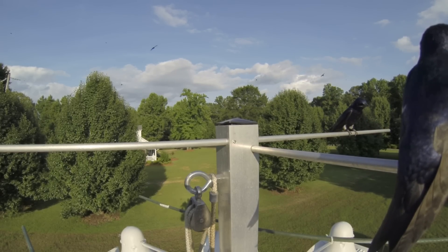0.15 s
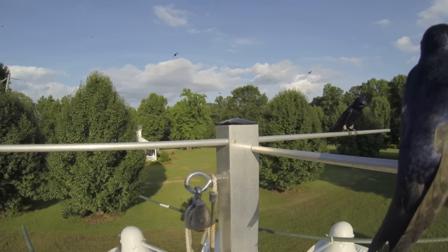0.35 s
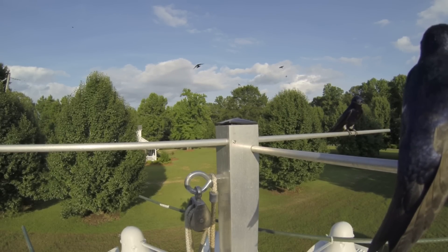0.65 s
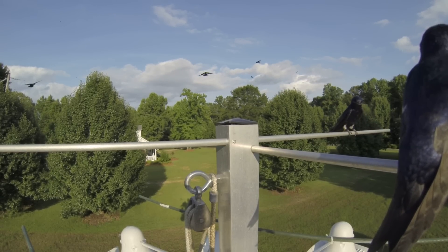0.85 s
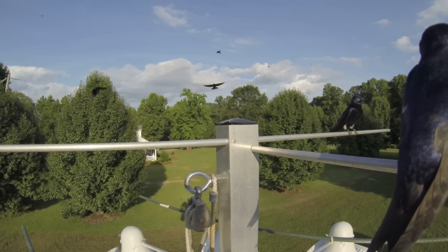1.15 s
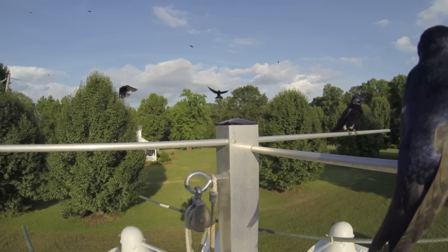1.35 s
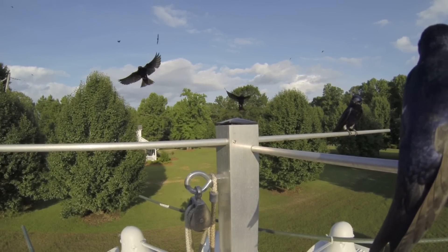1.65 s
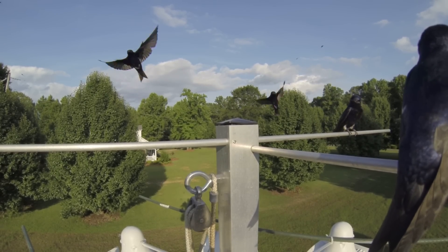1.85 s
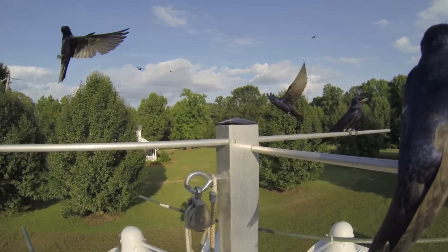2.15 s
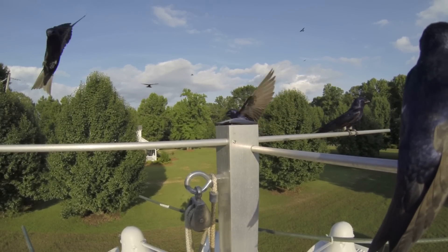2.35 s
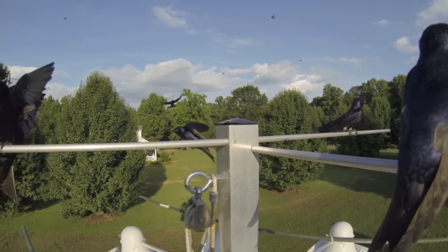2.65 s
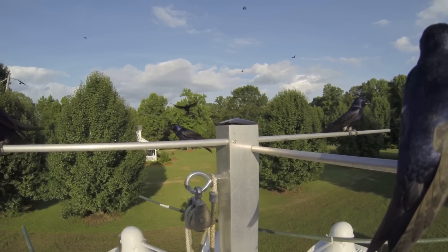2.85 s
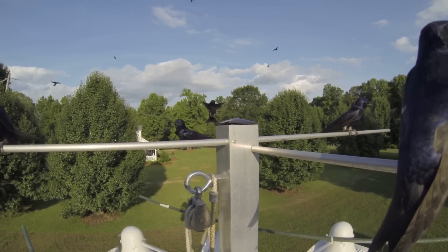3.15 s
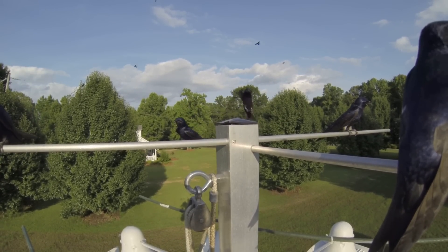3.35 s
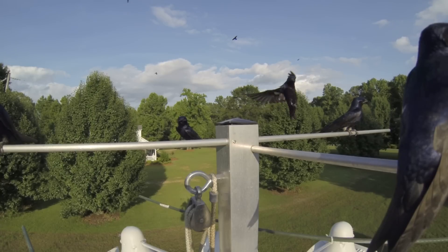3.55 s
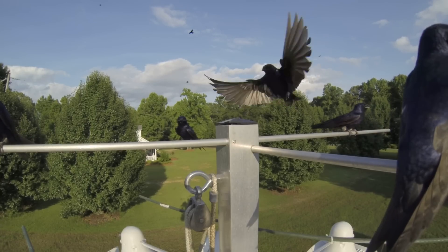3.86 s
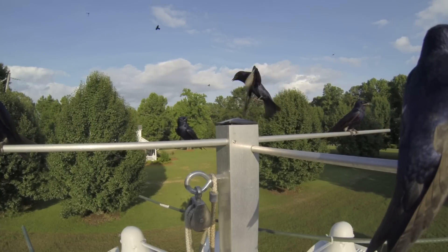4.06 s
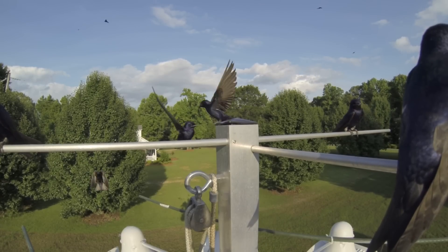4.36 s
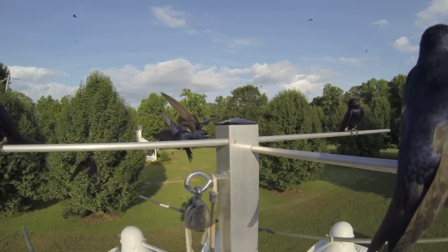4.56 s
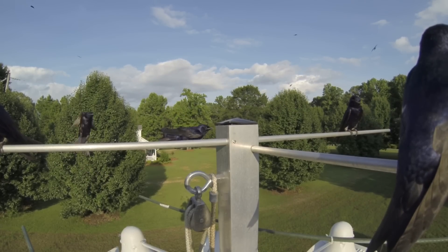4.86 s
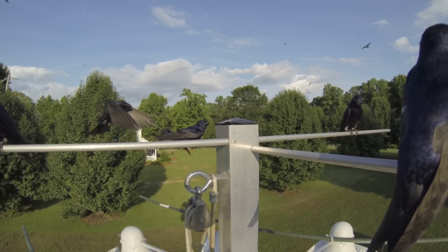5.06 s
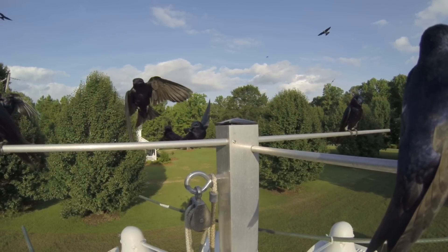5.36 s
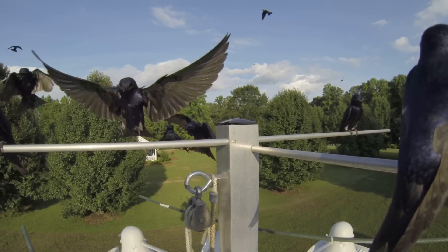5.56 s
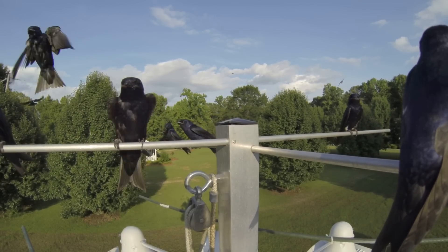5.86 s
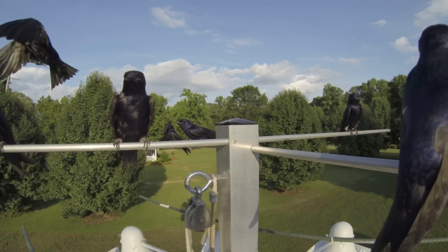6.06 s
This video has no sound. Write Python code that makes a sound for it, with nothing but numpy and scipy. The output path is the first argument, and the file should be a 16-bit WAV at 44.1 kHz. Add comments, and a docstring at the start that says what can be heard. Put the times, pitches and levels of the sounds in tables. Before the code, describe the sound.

Outdoor martin colony heard from a microphone mounted among the perches. It begins nearly quiet, with soft rumble, hiss and thin electronic whine and one faint falling buzz. Quick downward chirps then arrive in clusters, mixed with lower throaty notes and noisy rasps. One strong, rapid trill sounds near the middle; afterwards the lively chatter keeps going. Close surfaces blur each call and distant trees return a faint answer.

```python
"""Purple martins chatter on their bird house on an open lawn, round the microphone of a camera mounted on it.
Throughout: a low outdoor rumble, steady hiss and the thin electrical whine of the camera.
A faint trilled buzz opens at half a second; from about 1.1 s steep falling whistles come thick, among
short lower notes, noisy rasps and, near 3.1 s, the loudest buzz, with its own faint echo from the trees.
The house throws each call back at once, and trees some 26 m off answer 0.15 s later, until the end."""
import sys
import numpy as np
from scipy import signal
from scipy.fft import rfft, irfft, next_fast_len
from scipy.io import wavfile

SR = 44100
rng = np.random.default_rng(int(sys.argv[2]) if len(sys.argv) > 2 else 0)


def to_wav(sig):
    """Store sig (one row per channel, or 1-D mono) as 16-bit WAV at the path in sys.argv[1].

    Samples outside -1..1 are clipped; the rate is SR.
    """
    pcm = np.clip(np.atleast_2d(sig), -1, 1) * 32767
    pcm = np.round(pcm).astype(np.int16)
    wavfile.write(sys.argv[1], SR, pcm.T)  # frames by channels


N = 273420  # samples, 6.2 s
EDGE_HZ = 15300  # upper band limit


def amp(db):
    """Decibels to gain."""
    return 10 ** (np.asarray(db) / 20)


def evened(x):
    """Scales to an rms of 1."""
    return x / np.sqrt(np.mean(x ** 2) + 1e-20)


def read(points, hz):
    """A spectrum joined by straight lines on a log-frequency axis."""
    f, value = np.transpose(points)
    return np.interp(np.log(hz + 1), np.log(f + 1), value)


def add(mix, s, sound):
    """Mixes a sound in at s seconds."""
    part = mix[max(round(s * SR), 0):][:len(sound)]
    part += sound[:len(part)]


def coloured(count, gain):
    """Noise of rms 1 whose spectrum follows gain(Hz)."""
    size = next_fast_len(count + 2048)
    spectrum = rfft(rng.standard_normal(size))
    noise = irfft(spectrum * gain(np.fft.rfftfreq(size, 1 / SR)), size)
    return evened(noise[:count])


def below(f, hz):
    """Gain of a gentle low-pass, halved at hz."""
    return 1 / (1 + (f / hz) ** 4)


def wander(count, hz):
    """Slow chance of rms 1, up to about hz."""
    return coloured(count, lambda f: below(f, hz))


def fade(t, edge, release=None):
    """Soft start, edge seconds long, and a soft stop of the same length unless release is given."""
    ramp = np.minimum(t / edge, (t[-1] - t) / (release or edge))
    return np.sin(np.pi / 2 * np.clip(ramp, 0, 1)) ** 2


# Steady electrical tones of the camera: (frequency [Hz], level [dB])
WHINE_TONES = [(646.0, -62), (1174, -60), (1292, -58.5), (1351, -53), (1938, -58)]


def whine(waver=0.07):
    """Faint electrical tones at the microphone, wavering slightly together."""
    t = np.arange(N) / SR
    tones = sum(amp(db) * np.sin(2 * np.pi * (hz * t + rng.random())) for hz, db in WHINE_TONES)
    return np.sqrt(2) * tones * (1 + waver * wander(N, 3.3))


# Spectral shape of the outdoor air: (frequency [Hz], relative level per Hz [dB])
AIR_SPECTRUM = [(25, -1.5), (60, -1.5), (140, -2.5), (300, -12), (800, -15), (1600, -19.5), (3100, -21.5),
                (4600, -33.5), (5300, -34.5), (7500, -48), (9200, -28.5), (10000, -43.5), (11200, -39),
                (12200, -60.5)]


def air(rumble_db=-42.5, hiss_db=-47, split_hz=220, swell_db=1):
    """Steady outdoor hiss over a rumble that swells with the breeze."""
    def rumble_colour(f):
        return amp(read(AIR_SPECTRUM, f)) * below(f, split_hz)

    def hiss_colour(f):
        return amp(read(AIR_SPECTRUM, f)) * np.sqrt(1 - below(f, split_hz) ** 2)

    rumble = coloured(N, rumble_colour) * amp(rumble_db + swell_db * wander(N, 1.6))
    return rumble + amp(hiss_db) * coloured(N, hiss_colour)


def scatter(x, delay, t60, top_hz):
    """A diffuse echo, dying by 60 dB in t60 seconds, that has lost its treble above top_hz."""
    t = np.arange(SR) / SR
    decay = (t > delay) * amp(-60 * np.maximum(t - delay, 0) / t60)
    tail = wander(SR, top_hz) * decay
    # the energy returned is in proportion to the band that survives
    tail /= np.sqrt(np.sum(tail ** 2) * SR / 2 / top_hz)
    return signal.fftconvolve(x, tail)[:N]


# Single reflections from the gourds and rails close by: (delay [s], level [dB])
NEAR_ECHOES = [(.0031, -33), (.0058, -16.5), (.0094, -29.5), (0.0192, -26.5)]


def yard(x, house_db=-16, lawn_db=-29, trees_db=-31, trees_delay=0.15):
    """Direct sound, clutter of the bird house, near reflections, lawn and the late answer of the trees."""
    out = x + amp(house_db) * scatter(x, delay=0.0071, t60=0.24, top_hz=11000)
    for delay, db in NEAR_ECHOES:
        add(out, delay, amp(db) * x)
    out += amp(lawn_db) * scatter(x, delay=0.014, t60=0.57, top_hz=4400)
    return out + amp(trees_db) * scatter(x, delay=trees_delay, t60=0.22, top_hz=4500)


def glide(u, first_hz, last_hz, scoop):
    """Pitch over a note (u from 0 to 1): even in octaves, its log sagging by scoop in the middle."""
    return first_hz * (last_hz / first_hz) ** u * np.exp(-scoop * 4 * u * (1 - u))


def effort(u, db, swell_db, arch_db):
    """Gain over a note (u from 0 to 1): swells or dies away steadily, and arches about its mean level."""
    return amp(db + swell_db * (u - .5) + arch_db * (4 * u * (1 - u) - 2 / 3))


# Colour of the overtones and rasps: (frequency [Hz], level [dB])
VOICE_COLOUR = [(3500, -3.5), (4500, -12.5), (5300, -12), (6200, -29), (6900, -21.5), (8000, -21),
                (9700, -23), (11500, -15.5), (12600, -24), (15000, -29)]


def syrinx(hz, overtone_db, fall_db=10.0, waver_db=3, thin_db=7, count=7):
    """A near-sine whose overtones flicker and thin out at high pitch; also returns its phase."""
    phase = 2 * np.pi * (np.cumsum(hz) / SR + rng.random())
    tone = np.sin(phase)
    # thin_db is lost per octave above 2800 Hz
    strength_db = overtone_db - thin_db * np.maximum(np.log2(hz / 2800), 0)
    for k in range(2, count + 1):
        flicker_db = waver_db * np.tanh(wander(len(hz), 93))
        db = strength_db - fall_db * np.log2(k - 1) + read(VOICE_COLOUR, k * hz) + flicker_db
        tone += amp(db) * np.sin(k * phase) * (k * hz < EDGE_HZ)
    return np.sqrt(2) * tone, phase


# Hoarse bursts: (start [s], end [s], level [dB], centre [Hz], width [Hz])
RASP_CALLS = [(1.399, 1.473, -34.5, 2750, 900), (1.564, 1.691, -41, 3460, 1300),
              (2.042, 2.123, -29.5, 2700, 500), (2.629, 2.736, -31, 1780, 1400),
              (2.636, 2.728, -34.5, 3300, 600), (2.637, 2.726, -43.5, 4800, 600),
              (3.687, 3.785, -43.5, 4850, 700), (4.069, 4.155, -23, 2840, 700),
              (4.132, 4.257, -37, 2090, 300), (4.345, 4.416, -38, 2800, 1210),
              (5.439, 5.494, -30.5, 2800, 1200), (5.581, 5.737, -28, 2300, 1480)]


def rasp(start, end, db, hz, width, rate=380, beat=.6, lumpy_db=2.5):
    """Chaotic vibration: uneven puffs of noise, about rate a second, in one broad throat resonance."""
    t = np.arange(0, end - start, 1 / SR)

    def throat(f):
        detuning = (f ** 2 - hz ** 2) / ((f + 1) * width)
        return amp(read(VOICE_COLOUR, f)) / (1 + detuning ** 2) ** 0.66

    noise = coloured(len(t), throat)
    puff_rate = rate * (1 + 0.168 * wander(len(t), 59))
    puffs = 1 + beat * np.sin(2 * np.pi * np.cumsum(puff_rate) / SR)
    lumps = amp(lumpy_db * wander(len(t), 61))
    return start, amp(db) * evened(noise * puffs * lumps) * fade(t, 0.023)


BUZZ_FALL_OCTAVES_PER_S, BUZZ_SCOOP, TRILL_DEPTH_HZ = 2.7, 0.045, 222
# Falling buzzes; the faint one at 3.354 s is the loud buzz echoed from the trees:
# (start [s], length [s], top [Hz], level [dB], arch of the level [dB], trill rate [per s])
FALLING_BUZZES = [(0.49, 0.24, 3720, -45, 8, 118), (2.438, 0.21, 3640, -29.5, 3, 130),
                  (3.122, 0.195, 3746, -19, -6.5, 141), (3.354, 0.079, 3660, -37.5, 4, 100),
                  (5.886, 0.16, 3390, -38.5, 4, 160)]


def buzz(start, length, top_hz, db, arch_db, rate, overtone_db=-18, throb=0.12,
         echo=0.47, echo_delay=0.014, waver_db=0.46):
    """A falling whistle that trills very fast, blurred by its reflection off the house."""
    t = np.arange(0, length, 1 / SR)
    u = t / t[-1]
    trill = 2 * np.pi * np.cumsum(rate * (1 + 0.027 * wander(len(t), 40))) / SR
    bottom_hz = top_hz * 2 ** (-BUZZ_FALL_OCTAVES_PER_S * length)
    hz = glide(u, top_hz, bottom_hz, BUZZ_SCOOP)
    hz = hz + TRILL_DEPTH_HZ * np.sin(trill) + 70 * wander(len(t), 430)
    tone, _ = syrinx(hz, overtone_db)
    gain = effort(u, db + waver_db * wander(len(t), 30), 0, arch_db)
    tone = tone * (1 + throb * np.cos(trill)) * gain * fade(t, 0.044)
    lag = round(echo_delay * SR)
    return start, np.pad(tone, (0, lag)) + echo * np.pad(tone, (lag, 0))


BEAD_DB, BEAD_HZ = 2.5, 59.4  # depth and speed of the chance wavering of a note's level


def whistle(length, pitch, level, overtone_db, edge, release, calm_per_s, jitter=0.014, rough=0.14,
            flutter=0.35, sub=0.94, clear_hz=3100, hoarse_hz=1300):
    """A gliding note; at low pitch the membrane turns rough and rattles at half its rate, as calm allows."""
    length = max(length, .005)
    t = np.arange(0, length + release / 2, 1 / SR)
    u = t / length
    unrest = 1 - np.clip(calm_per_s * t, 0, 1)
    hz = glide(u, *pitch) * (1 + jitter * unrest * wander(len(t), 194))
    tone, phase = syrinx(hz, overtone_db)
    # clean above clear_hz, fully rough hoarse_hz below that
    slack = unrest * np.clip((clear_hz - hz) / hoarse_hz, 0, 1)
    half_rate = np.sin(phase + phase / 2) + sub * np.sin(phase / 2)
    rattle = wander(len(t), 140) * half_rate
    tone = tone * (1 + flutter * slack * wander(len(t), 300)) + rough * slack * rattle
    beads = np.tanh(wander(len(t), BEAD_HZ))
    bead_gain = amp(BEAD_DB * unrest * (beads - beads.mean()))
    return tone * effort(np.minimum(u, 1), *level) * bead_gain * fade(t, edge, release)


# base values for a level note, and what each octave of fall adds to its scoop and swell
NOTE_SCOOP, NOTE_SCOOP_PER_OCTAVE = 0.081, -.15
NOTE_SWELL_DB, NOTE_SWELL_DB_PER_OCTAVE, NOTE_ARCH_DB = -10, 18, 3.5
# Short lower notes, some nearly level, some steep little chirps:
# (start [s], length [s], first pitch [Hz], last pitch [Hz], level [dB], overtones [dB])
SHORT_LOW_NOTES = [(1.183, 0.028, 2485, 2180, -32.5, -23), (1.411, 0.032, 2620, 1734, -23.5, -25),
                   (1.441, 0.04, 2470, 2480, -30.5, -24), (1.646, 0.033, 2055, 2370, -37, -15),
                   (2.045, 0.036, 2610, 2250, -23, -21), (2.066, 0.064, 1982, 2050, -31.5, -26),
                   (2.176, 0.026, 2490, 1910, -23.5, -22), (2.245, 0.04, 2700, 2010, -25.5, -24),
                   (2.731, 0.028, 2900, 1524, -21.5, 2.5), (2.79, .074, 2300, 2140, -18, -21),
                   (2.934, 0.035, 2560, 2125, -25, -25), (2.983, .02, 2710, 1640, -23.5, -9),
                   (3, 0.038, 2960, 1475, -22, -9), (3.038, 0.024, 2310, 1970, -23, -16),
                   (3.204, .037, 2790, 1660, -23, -22), (3.241, 0.029, 2450, 1850, -24.5, -30),
                   (3.319, 0.038, 2420, 2193, -23, -14), (3.7, 0.043, 2590, 2460, -32.5, -9),
                   (3.714, 0.065, 1895, 1900, -32.5, -12), (3.913, 0.04, 2700, 1800, -29, -18),
                   (3.982, .04, 2550, 2170, -24, -16), (4.084, 0.044, 2480, 1846, -17, -10),
                   (4.127, 0.045, 2204, 2540, -23, -35), (4.296, 0.035, 2435, 1930, -30.5, -24),
                   (4.369, .024, 2146, 2110, -29.5, -18), (4.542, 0.083, 2255, 1795, -23.5, -11),
                   (4.704, 0.028, 2180, 1774, -29.5, -0.5), (4.725, 0.04, 2874, 2305, -29, -12),
                   (4.748, 0.053, 2213, 1843, -34, -1), (4.911, 0.014, 2790, 1604, -25, -8),
                   (4.966, 0.057, 2480, 2030, -20.5, -13.5), (5.478, 0.053, 2170, 1806, -27.5, -6),
                   (5.572, 0.029, 1644, 1310, -32.5, -4), (5.668, 0.067, 2068, 1874, -21.5, -13),
                   (5.74, 0.058, 2755, 1790, -20.5, -11), (5.74, .084, 2122, 1357, -28.5, -9),
                   (5.842, 0.029, 2340, 2080, -24.5, -26), (6.161, .02, 2900, 1650, -19.5, 5.5)]


def low_note(start, length, first_hz, last_hz, db, overtone_db):
    """A short low whistle: its roughness eases with time, and its fall sets the scoop and swell."""
    fall = np.log2(first_hz / last_hz)
    pitch = first_hz, last_hz, NOTE_SCOOP + NOTE_SCOOP_PER_OCTAVE * fall
    level = db, NOTE_SWELL_DB + NOTE_SWELL_DB_PER_OCTAVE * fall, NOTE_ARCH_DB
    return start, whistle(length, pitch, level, overtone_db, edge=0.0063, release=0.0075, calm_per_s=9.1)


def hook(hz, db, length=0.0089, rise=0.094, soft_db=-7):
    """The quiet upward flick with which a chirp reaches its top pitch."""
    t = np.arange(0, length, 1 / SR)
    pitch = hz * (1 - rise * (1 - t / t[-1]) ** 2)
    return amp(db + soft_db) * np.sin(2 * np.pi * np.cumsum(pitch) / SR) * fade(t, length / 2)


CASE_HZ, CASE_WIDTH = 3178, 115  # ring of the camera's case and its bandwidth [Hz]
CHIRP_ARCH_DB = -0.5  # a chirp is this much weaker in the middle
# Steep falling chirps: (start [s], length [s], top [Hz], bottom [Hz], scoop: sag of the log pitch at
# mid-call, level [dB], swell from start to end [dB], overtones [dB], case ring [gain, none below 0])
CHIRP_CALLS = [(1.131, 0.053, 3530, 1623, .05, -29, 9.5, -11.5, 1.5),
               (1.366, 0.045, 4180, 1710, -0.049, -27.5, 13, -10, 7),
               (1.492, 0.069, 3910, 1590, -0.011, -22, -0.5, -13, 1),
               (1.542, 0.064, 3990, 1755, 0.17, -25, 7, -3, -1.5),
               (1.563, 0.083, 3680, 1992, .15, -24.5, 4, -5.5, 2.5),
               (1.999, .049, 3970, 1676, 0.044, -25, 3, -10.5, 5),
               (2.117, .06, 3940, 1617, -0.067, -21, 2, -12.5, 1),
               (2.208, 0.036, 3850, 1640, -.13, -25.5, 14, -11.5, 6),
               (2.742, 0.054, 4380, 1807, 0.18, -16.5, 1.5, 0, 2),
               (2.871, .068, 4130, 1690, 0.12, -26.5, 7.5, -12.5, 6),
               (3.275, 0.065, 4120, 1486, -0.046, -22, -10, -9.5, 3.5),
               (3.64, 0.058, 4300, 1652, 0, -29, 6, -11, 10.5),
               (3.879, 0.037, 3690, 1584, -0.11, -26, 0.5, -12.5, 3),
               (3.924, 0.06, 4000, 1617, -0.0015, -20, 4.5, -11.5, 1.1),
               (4.036, .054, 3950, 1730, .12, -17.5, -6, 1, 3.5),
               (4.301, 0.062, 4260, 1787, 0.16, -28.5, -1, -1, 1),
               (4.492, 0.055, 4260, 1780, 0.11, -21, -4, -8.5, 0),
               (4.602, 0.069, 3810, 1754, .15, -26, 2, -0.5, -6),
               (4.654, 0.053, 3950, 1975, -0.072, -30.5, 8, -3, -0.5),
               (4.887, .032, 4480, 3420, 0.081, -29.5, 14, -2, 3.5),
               (4.917, .059, 3790, 1738, 0.17, -19.5, -7, -3.5, 2.5),
               (5.391, 0.062, 4486, 1780, 0.12, -21, -1, -8, 1.5),
               (5.517, 0.057, 3860, 1898, 0.14, -19.5, 5.5, -3, -1),
               (5.578, 0.058, 3820, 1746, 0.14, -17.5, 3.5, -14, 0),
               (5.61, 0.06, 4350, 1730, .01, -15.5, 3, -6.5, 0.9),
               (5.692, 0.05, 4350, 1850, 0.057, -24, 7, -26, 0),
               (5.724, .02, 4270, 3080, .03, -30, -13, -9, -2),
               (5.788, 0.053, 4000, 1515, -0.1, -21, -0.5, -7.5, 1.8),
               (5.866, 0.079, 3840, 1980, 0.13, -24.5, 0.5, -16, 3),
               (6.04, 0.079, 4380, 1610, 0.0071, -40.5, 12, -5, -2),
               (6.165, 0.038, 4350, 2190, 0.088, -17.5, 9.5, 3.5, 4.5)]


def chirp(start, length, top_hz, bottom_hz, scoop, db, swell_db, overtone_db, ring, lead=0.0055):
    """A flick and a steep sweep; some chirps ring the camera's case round the microphone and beat with it."""
    sound = np.zeros(SR // 5)
    add(sound, 0, hook(top_hz, db - swell_db / 2))
    pitch = top_hz, bottom_hz, scoop
    level = db, swell_db, CHIRP_ARCH_DB
    sweep = whistle(length, pitch, level, overtone_db, edge=0.0065, release=0.013, calm_per_s=0)
    add(sound, lead, sweep)
    b, a = signal.iirpeak(CASE_HZ, CASE_HZ / CASE_WIDTH, fs=SR)
    return start - lead, sound + max(ring, 0) * signal.lfilter(b, a, sound)


def scene():
    """All the calls sound through the yard, over the air and the camera's whine."""
    birds = np.zeros(N)
    voices = (rasp, RASP_CALLS), (buzz, FALLING_BUZZES), (low_note, SHORT_LOW_NOTES), (chirp, CHIRP_CALLS)
    for voice, calls in voices:
        for row in calls:
            add(birds, *voice(*row))
    return (yard(birds) + air() + whine())[None]


def record(dry):
    """The band limit of the recorder: a steep low-pass."""
    low_pass = signal.firwin(511, EDGE_HZ, window=("kaiser", 9), fs=SR)
    return signal.oaconvolve(dry, low_pass[None], "same")


dry = scene()
out = record(dry)
to_wav(out)
```